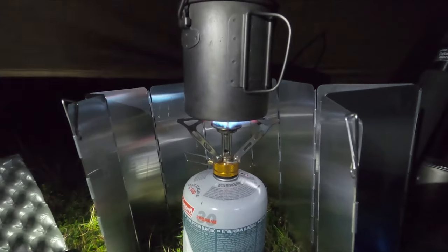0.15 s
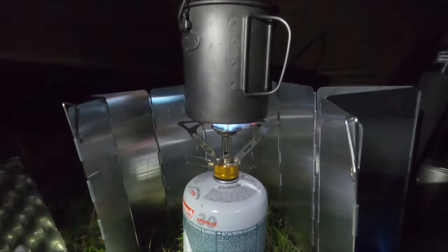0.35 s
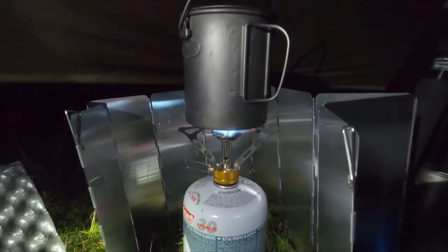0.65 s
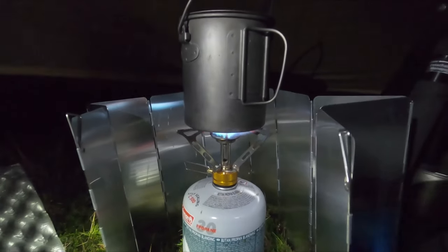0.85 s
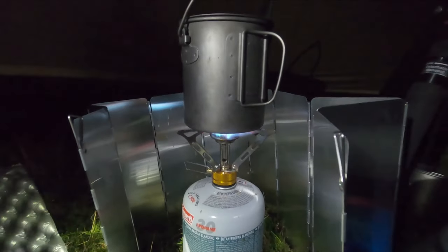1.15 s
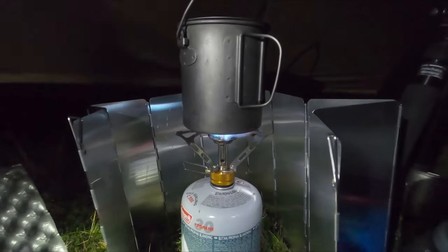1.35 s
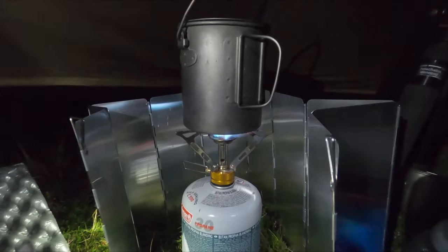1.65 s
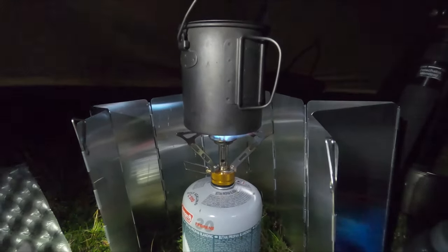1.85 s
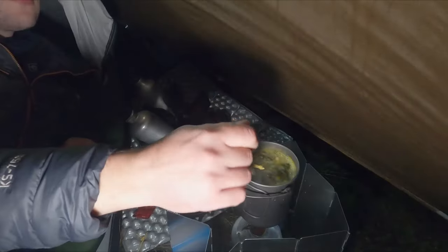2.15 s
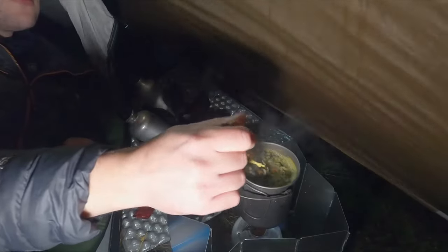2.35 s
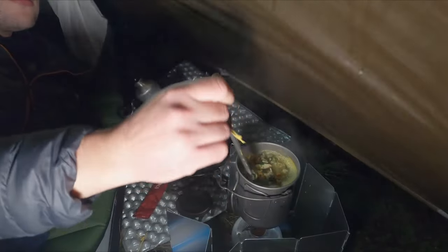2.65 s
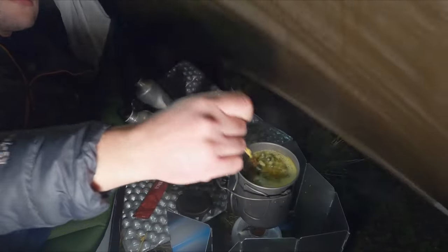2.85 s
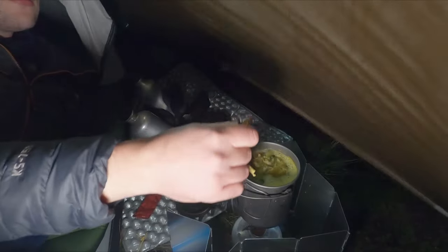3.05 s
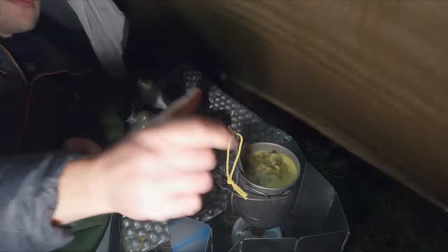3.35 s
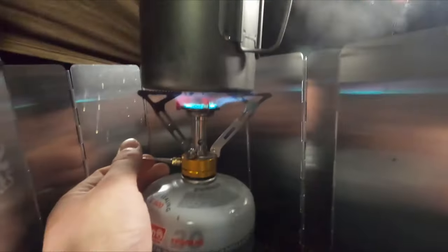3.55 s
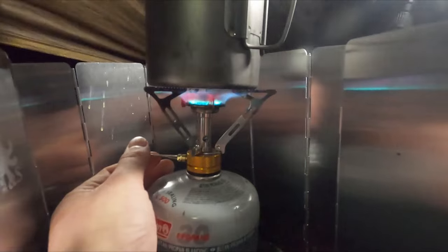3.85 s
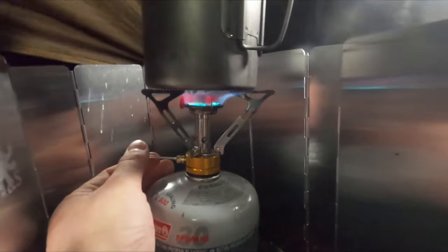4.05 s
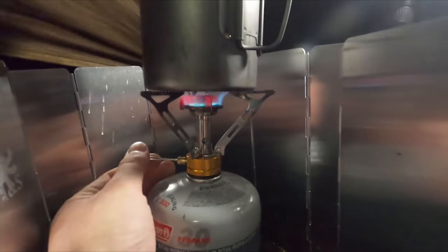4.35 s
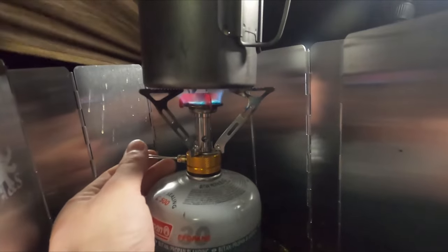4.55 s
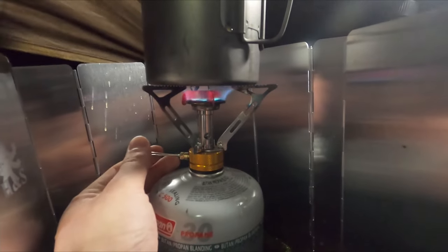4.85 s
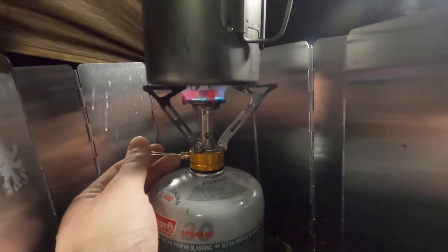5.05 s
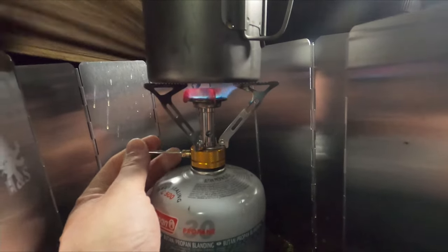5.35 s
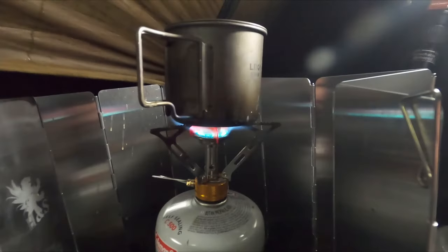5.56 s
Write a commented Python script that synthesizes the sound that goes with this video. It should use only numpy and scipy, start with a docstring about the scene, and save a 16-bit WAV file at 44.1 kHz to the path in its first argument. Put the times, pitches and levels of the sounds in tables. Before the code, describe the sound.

A small canister stove burns beneath a metal pot in a tent, heard closely in stereo with short reflections from a folding windscreen. From 0 to 2.0 s it is loudest: a dense, steady low-mid roar with bright jet hiss, whose thin metallic resonances gently swell and shift. At 2.0 s the sound cuts to a softer, duller burn from above. Deep soft bumps come near 2.8 and 3.04 s, with a small pop at about 3.1 s and a stronger thump at 3.44 s. At 3.5 s the view is close to the valve; hiss drops away and the flame sputters in rapid hollow puffs. From about 4.1 to 5.4 s it is very quiet: sparse fluttery pops, tiny dry metal ticks, faint bumps and soft air rumble. At 5.46 s a fuller, steady flame cuts in, with one sharper tick near 5.56 s.

```python
"""Gas stove in a tent.

A canister stove burns under a pot inside a folding windscreen: band-shaped noise for roar and jet hiss.
Heard from the front, from above the pot, then by the valve, where the gas is turned down.
There the flame sputters in single pressure pulses and hot metal ticks in bursts of filtered noise.
Low bumps and a soft air rumble lie around it; at the end the flame burns high again."""
import sys
import numpy as np
from scipy import signal
from scipy.fft import rfft, irfft, next_fast_len
from scipy.io import wavfile
from scipy.ndimage import uniform_filter1d

SR = 44100
rng = np.random.default_rng(int(sys.argv[2]) if len(sys.argv) > 2 else 0)


def master(y):
    """Save y as 16-bit WAV."""
    cut = np.clip(np.atleast_2d(y).T, -1, 1)
    pcm = np.round(cut * 32767)  # scale
    wavfile.write(sys.argv[1], SR, pcm.astype(np.int16))


N = 250929

# flame roar spectrum from each place: freq_hz, relative_db
ROAR_FRONT = [(15, -18), (40, -13), (80, -2.5), (120, 0.5), (165, -2.5), (346, -11.5), (481, -11.5),
              (572, -18), (693, -13), (873, -18.5), (1150, -17.5), (1790, -13), (1930, -23), (2700, -58.5)]
ROAR_ABOVE = [(12, -19), (20, 2), (32, -1), (60, -4.5), (160, -6.5), (346, -22.5), (462, -16.5),
              (654, -11.5), (809, -17), (925, -25.5), (1190, -22.5), (1560, -37.5), (2000, -37),
              (2600, -61), (4400, -120)]
ROAR_CLOSE = [(12, -34), (20, -3), (120, 0.5), (175, 3.5), (250, -1.5), (397, -9), (523, -16.5),
              (650, -13.5), (807, -17.5), (1400, -20.5), (1740, -28), (2200, -36), (2860, -75),
              (4840, -120)]
ROAR_HIGH = [(12, -30), (25, 1), (80, -1.5), (140, -3.5), (220, -4), (340, -4), (560, -16), (730, -12),
             (950, -25.5), (1300, -24), (1750, -26.5), (2000, -34), (3000, -62)]
# jet hiss spectrum from each place: freq_hz, relative_db
HISS_FRONT = [(1500, -36), (2000, 0.5), (2400, -6), (3600, -0.5), (4800, -5.5), (5900, -9.5), (6400, -12),
              (9000, -14.5), (12000, -25), (15000, -54)]
HISS_ABOVE = [(1500, -41), (2100, -3.5), (3000, 0.5), (4100, -3.5), (5300, -7.5), (6200, -10),
              (9000, -15.5), (12000, -27), (15000, -35)]
HISS_CLOSE = [(1600, -13), (2200, 4.5), (3500, 2), (5000, 1), (6600, -2.5), (7400, -5.5), (9500, -7.5),
              (12500, -13), (15000, -27)]
# resonances of burner tube, pot and windscreen in the hiss: center_hz, width_hz, lift_db
RINGS_FRONT = [(2645, 244, 11), (3295, 300, 7.5), (3740, 270, 2), (4140, 180, 3), (4780, 220, 7.5),
               (5720, 390, 7)]
RINGS_ABOVE = [(2663, 160, 13.1), (2980, 140, 7), (3560, 410, 4.9), (4670, 180, 5), (5580, 130, 4.9)]
RINGS_CLOSE = [(2800, 360, 8.4), (5850, 600, 14), (8400, 700, 4.2)]
RINGS_HIGH = [(5860, 450, 16), (6800, 450, 6), (8950, 470, 10), (10000, 600, 6)]
# resonances that open for a while: middle_s, half_length_s, center_hz, width_hz, lift_db
SWELLS_FRONT = [(.45, 0.22, 3230, 170, 7.5), (.88, 0.24, 2630, 170, 11.5), (1.35, 0.28, 3220, 220, 9.5),
                (1.86, .17, 2650, 169, 12)]
SWELLS_ABOVE = [(2.75, .14, 4770, 280, 10), (2.71, 0.12, 2600, 580, 10), (3.2, 0.35, 3620, 260, 10),
                (3.3, 0.41, 2860, 220, 8.5), (3.37, .17, 5500, 690, 5)]
# stronger rustle of the low flame: middle_s, half_length_s, level_db
FLURRIES = [(4.18, .03, -58.5), (4.657, .022, -64), (4.77, .03, -63), (4.869, .02, -56),
            (4.955, .03, -58.5), (5.124, .018, -58), (5.446, 0.031, -55)]
# loudest flame puffs, before the gap under the pot: middle_s, peak_db, pitch_hz
PUFFS = [(3.082, -24.5, 750), (3.505, -35.0, 700), (3.539, -39.5, 750), (3.57, -41, 700),
         (3.582, -36.5, 850), (3.655, -34, 1090), (3.661, -33.0, 700), (3.674, -38.0, 900),
         (3.685, -29.5, 750), (3.701, -38.5, 800), (3.74, -36.5, 902), (3.753, -38.0, 750),
         (3.778, -40, 800), (3.814, -36, 950), (3.822, -31.0, 700), (3.852, -39.0, 700), (3.887, -37, 700),
         (3.901, -34.0, 854), (3.908, -33, 800), (3.923, -32.5, 1450), (3.957, -36.5, 900),
         (3.966, -40.0, 850), (3.983, -37.5, 1100), (4.007, -36.5, 855), (4.023, -40.5, 650),
         (4.057, -43, 650), (4.064, -43, 650), (4.087, -38, 800), (4.094, -40, 850), (4.12, -45, 700),
         (4.148, -42.0, 900), (4.196, -36, 700), (4.297, -44.0, 950), (4.304, -44.0, 850),
         (4.34, -44.0, 900), (4.35, -45.5, 850), (4.356, -39.5, 1300), (4.443, -43, 1450), (4.47, -41, 950),
         (4.499, -40, 795), (4.56, -42.5, 1350), (4.603, -44, 800), (4.629, -45.0, 900),
         (4.641, -43.5, 900), (4.651, -41.0, 850), (4.7, -42, 650), (4.721, -44, 1100), (4.808, -37.5, 600),
         (4.856, -33.5, 900), (4.867, -43, 750), (4.878, -33, 650), (4.887, -45.5, 700), (4.946, -40, 750),
         (4.954, -45.0, 900), (4.964, -39.5, 1050), (4.981, -36.5, 700), (5.035, -38.5, 760),
         (5.107, -41, 850), (5.113, -46, 850), (5.125, -42.5, 800), (5.138, -48, 700), (5.223, -38, 850),
         (5.309, -43, 755), (5.325, -40, 700), (5.339, -43.0, 750), (5.403, -42.0, 1050),
         (5.42, -40.0, 900), (5.433, -35.5, 800), (5.445, -41.5, 1050)]
# colour of hot metal: freq_hz, gain_db
METAL = [(900, -1), (1700, 0), (3000, -0.5), (3800, -5), (4700, 0.5), (5700, -1), (6600, -6.5),
         (7700, -4.5), (12500, -9), (15000, -10)]
# clearest metal ticks and creaks, before the metal colour: start_s, peak_db, pitch_hz, t60_s
TICKS = [(3.616, -44, 2900, .012), (3.73, -48, 2700, .012), (3.777, -51, 3000, .012),
         (3.863, -49, 8500, .015), (3.964, -44, 6900, .016), (4.007, -50.5, 3000, .015),
         (4.014, -54, 4700, .02), (4.304, -59, 6000, .015), (4.354, -59, 5500, .04),
         (4.442, -48.5, 2100, .009), (4.442, -49, 5000, 0.0083), (4.604, -59, 3100, .014),
         (4.619, -49, 5400, .011), (4.628, -51, 5300, .009), (4.736, -58, 5000, .012),
         (4.855, -47, 2400, 0.039), (4.856, -52.5, 5000, .04), (4.893, -51.5, 4900, .012),
         (5.104, -54, 3000, 0.042), (5.103, -58, 5800, .025), (5.125, -53, 2300, .05),
         (5.123, -58, 6500, .04), (5.262, -56, 4600, .014), (5.283, -52, 4800, .012),
         (5.445, -48, 5000, .01), (5.556, -38, 3600, .012)]
# dull bumps near the microphone: middle_s, peak_db, pitch_hz
BUMPS = [(2.807, -21.5, 30), (3.042, -27, 40), (3.436, -15.5, 48.6), (4.5, -43.5, 218),
         (4.232, -37.5, 35.6), (4.765, -43, 200), (4.878, -36, 170), (4.985, -45, 210), (5.13, -35.5, 92),
         (5.325, -42, 230)]
# channel balance at full flame: freq_hz, left_minus_right_db
CHANNEL_BALANCE = [(60, 2.5), (110, 1.5), (200, 1.5), (370, 0.0), (690, -1.0), (1260, -0.5), (2320, 4),
                   (4260, 1), (7840, 0.5), (14400, -2)]
# extra travel time by windscreen panels and tent wall: lag_ms
PANEL_LAGS_MS = [1.3, 2.2, 3.1, 5.3]
# valve closed to a simmer, then opened: time_s, flow_db
GAS_FLOW = [(3.49, 1.5), (3.7, -0.5), (4.01, -1.5), (4.1, -12), (4.25, -15), (4.4, -19.5), (4.7, -15.5),
            (5.38, -16.5), (5.46, -6)]
# jet hiss close by, fading before the roar: time_s, level_db
SIMMER_HISS = [(3.49, -64.5), (3.7, -64.5), (3.8, -68), (3.91, -70.5), (3.99, -70), (4.1, -75), (4.25, -84),
               (4.7, -92), (5.38, -90), (5.46, -73)]

# changes of listening place
TO_ABOVE_S, TO_VALVE_S, TO_HIGH_S = 2.024, 3.490, 5.460
# full flame from each place: roar_db, hiss_db
FRONT_DB, ABOVE_DB, HIGH_DB = (-26.5, -39), (-31.5, -45.5), (-34.5, -58)
SIMMER_ROAR_DB = -39.5  # at 0 dB flow
# faint ticks: peak_db, pitch_hz, t60_s
TICK_Q, FAINT_TICK = 1.33, (-57, 4900, 0.0092)
BUMP_CYCLES = 0.9
# crack on top of a loud puff (level against the puff); mean pitch of the small puff beside it
CRACK_DB, CRACK_HZ, HUDDLE_HZ = -23.5, 2300, 850
TOP_HZ = 14400

T = np.arange(N) / SR
FFT_SIZE = 2 * next_fast_len(N // 2 + 1024)
F = np.maximum(np.arange(FFT_SIZE // 2 + 1) * SR / FFT_SIZE, 1)


def undb(db):
    """Decibels to gain."""
    return 10 ** (np.asarray(db) / 20)


def unit(x):
    """Scale to rms 1."""
    return x / np.sqrt(np.mean(x ** 2))


def shape(points):
    """Gain at every FFT frequency from (freq_hz, gain_db) points."""
    hz, db = np.transpose(points)
    return undb(np.interp(np.log(F), np.log(hz), db))


def colour(x, gain):
    """Filter by a gain at every FFT frequency."""
    return irfft(rfft(x, FFT_SIZE) * gain, FFT_SIZE)[..., :N]


def walk(rate_hz):
    """Smooth random wander, spread near 1."""
    k = max(int(SR / rate_hz), 1)
    steps = np.repeat(rng.standard_normal(N // k + 1), k)
    return 1.3 * uniform_filter1d(uniform_filter1d(steps, k), k)[:N]


def add(track, start_s, sound):
    """Mix a short sound into a track."""
    i = int(np.clip(start_s * SR, 0, N - 1))
    track[i:i + len(sound)] += sound[:N - i]


def between(start_s, end_s):
    """Gate with 4 ms edges."""
    return uniform_filter1d(1. * ((T >= start_s) & (T < end_s)), size=176)


def roar(spectrum, flutter_db, crackle_db):
    """Turbulent burning: the whole flame flutters, its upper part comes in quick bursts."""
    gain = shape(spectrum)
    upper = F ** 4 / (F ** 4 + 450 ** 4)
    noise = rng.standard_normal((3, N))
    bursts = unit(noise * undb(crackle_db * walk(220)))
    flame = colour(noise, gain * (1 - upper)) + colour(bursts, gain * upper)
    flame = flame * undb(flutter_db * walk(24.99))
    # level is set by the part above 60 Hz
    return flame / np.std(colour(flame, F > 60))


def reflections(x, echo_db, drift_ms):
    """Panels return the hiss a few ms later; paths shift as the hand-held microphone sways."""
    out = x
    for lag_ms in PANEL_LAGS_MS:
        source_s = T - (lag_ms + drift_ms * walk(1.5)) / 1000
        echo = np.array([np.interp(source_s, T, row) for row in x])
        out = out + undb(echo_db) * echo
    return out


def ring(spectrum, center_hz, width_hz, lift_db, flicker_db, drift):
    """One hiss resonance; swirling hot air makes it swell and bend gently on its own."""
    peak_db = lift_db / (1 + (2 * (F - center_hz) / width_hz) ** 2)
    # power added above the plain hiss
    lift = np.sqrt(undb(2 * peak_db) - 1)
    band = colour(rng.standard_normal((3, N)), shape(spectrum) * lift)
    bent_s = (T + np.cumsum(drift * walk(5)) / SR) % T[-1]
    bent = np.array([np.interp(bent_s, T, row) for row in band])
    return bent * unit(undb(flicker_db * walk(4)))


def hiss(spectrum, rings, waver_db, flicker_db, drift, swells=()):
    """Gas rushing from the jet, lifted at metal resonances; some only swell and pass."""
    rush = unit(reflections(rng.standard_normal((3, N)), echo_db=-14, drift_ms=.06))
    jet = colour(rush, shape(spectrum))
    for row in rings:
        jet = jet + ring(spectrum, *row, flicker_db, drift)
    for middle_s, half_s, *row in swells:
        opening = np.exp(-((T - middle_s) / half_s) ** 4)
        jet = jet + ring(spectrum, *row, flicker_db, drift) * opening
    return unit(jet) * undb(waver_db * walk(23.96))


def ports(direct, scattered, diffuse_hz, treble_lag_ms):
    """Two microphone ports: direct sound reaches the left later, treble comes scattered from all sides."""
    share = F ** 2 / (F ** 2 + diffuse_hz ** 2)
    # low tones bend around the housing and lag longer
    lag_ms = treble_lag_ms * (1 + 5.5 / (1 + (F / 480) ** 2))
    delay = np.exp(-1j * np.pi * F * lag_ms / 1000 * np.array([[1], [-1]]))
    return colour(direct, np.sqrt(1 - share) * delay) + colour(scattered, np.sqrt(share))


def burner(roar_db, hiss_db, flame, jet, diffuse_hz, treble_lag_ms):
    """Flame and jet at their levels, as they arrive at the microphone."""
    sound = flame * undb(roar_db) + jet * undb(hiss_db)
    return ports(sound[0], sound[1:], diffuse_hz, treble_lag_ms)


def still_air(rumble_db, hiss_db):
    """Low rumble of moving air, and a faint hiss that stays when the gas is low."""
    rumble_shape = shape([(10, -18), (22, 6.0), (70, 6.0), (150, -10.5), (400, -32), (2000, -70)])
    fizz_shape = shape([(500, 12.5), (2800, -1.5), (3950, -8.0), (4700, -2.5), (5500, -4.5),
                        (6500, -9.5), (7700, -5.5), (11000, -19.0), (15000, -24)])
    rumble = unit(colour(rng.standard_normal((3, N)), rumble_shape))
    fizz = unit(colour(rng.standard_normal((3, N)), fizz_shape))
    air = undb(rumble_db + 2 * walk(7)) * rumble + undb(hiss_db) * fizz
    return ports(air[0], air[1:], diffuse_hz=7850, treble_lag_ms=0.027)


def bumps():
    """Soft low knocks: cosines under a Gaussian, a cycle or two long."""
    out = np.zeros(N)
    for middle_s, db, hz in BUMPS:
        cycles = hz * (T - middle_s)
        out -= undb(db) * np.cos(2 * np.pi * cycles) * np.exp(-(cycles / BUMP_CYCLES) ** 2)
    return out


def puff_train(rows):
    """Each pocket of gas that burns at once sends one pressure swing, about a cycle long."""
    out, t = np.zeros(N), np.arange(-128, 128) / SR
    for middle_s, db, hz in rows:
        u = (np.pi * hz * t) ** 2
        add(out, middle_s + t[0], -undb(db) * (1 - 2 * u) * np.exp(-u))
    return out


def flow_db(time_s):
    """Gas flow through the valve."""
    return np.interp(time_s, *np.transpose(GAS_FLOW))


def sputter(small_db, spread_db, cluster_db, cluster_s, count):
    """Starved flame: loud puffs, each with a thin crack and a smaller puff; faint ones in between."""
    when, pitch = rng.random((count, 2)).T
    small_s = TO_VALVE_S + when * (TO_HIGH_S - TO_VALVE_S)
    spread = spread_db * np.clip(rng.standard_normal(count), -2, 1)
    # more gas makes bigger puffs
    level_db = small_db + 0.19 * flow_db(small_s) + spread
    small = zip(small_s, level_db, 420 * 2 ** (1.8 * pitch))
    cracks = [(s, db + CRACK_DB, CRACK_HZ) for s, db, _ in PUFFS]
    huddle = np.array([(s + cluster_s / 2, db + cluster_db, HUDDLE_HZ) for s, db, _ in PUFFS])
    huddle = huddle + rng.standard_normal(huddle.shape) * [cluster_s, 2, 200]
    return puff_train(PUFFS) + puff_train(cracks) + puff_train(huddle) + puff_train(small)


def puff_rings(ring_db, ring_ratio, t60_s):
    """A loud puff leaves the air under the pot ringing for a few cycles, mostly above its own pitch."""
    out, t = np.zeros(N), np.arange(2048) / SR
    for (s, db, hz), detune in zip(PUFFS, rng.standard_normal(len(PUFFS))):
        ring_hz = min(hz * ring_ratio * 2 ** (0.23 * detune), 1850)
        decay = undb(db + ring_db - 60 * t / t60_s)
        add(out, s, -decay * np.sin(2 * np.pi * ring_hz * t))
    return out


def under_pot(puffs, slap_s, slap_db, tail_db, t60_s):
    """Puffs leave by the gap under the pot, slap back once off the windscreen, die away in the tent."""
    t = np.arange(4096) / SR
    tail = rng.standard_normal(len(t)) * undb(-60 * t / t60_s) * (t > slap_s)
    tent = signal.fftconvolve(puffs, tail / np.linalg.norm(tail))[:N]
    slap = 1 + undb(slap_db) * np.exp(-2j * np.pi * F * slap_s)
    # 1.8 kHz resonance with a notch just above
    gap = shape([(200, 7.5), (500, 0), (660, 3.5), (950, -2.5),
                 (1300, 1.0), (1800, 3.0), (2150, -9.0), (3000, 2.5)])
    return colour(puffs, gap * slap) + undb(tail_db) * colour(tent, gap)


def hand_shadow(pass_s, pass_width_s, pass_db):
    """The stirring hand dims the jet as it passes over the pot."""
    return undb(pass_db * np.exp(-((T - pass_s) / pass_width_s) ** 2))


def rustle(steady_db, grain_db):
    """The edge of the low flame rustles softly all the time, and more in short flurries."""
    grains = rng.standard_normal(N) * undb(grain_db * walk(260))
    edge = shape([(250, -14), (550, 0.5), (1200, 1), (1900, -8.5), (3000, -28), (6000, -51)])
    level = undb(steady_db) * between(TO_VALVE_S, TO_HIGH_S)
    for middle_s, half_s, db in FLURRIES:
        level = level + undb(db) * np.exp(-((T - middle_s) / half_s) ** 4)
    return unit(colour(grains, edge)) * level


def ticks(rise_s, tail_db, tail_t60_s, count):
    """Metal slips as it heats and cools: dry snaps or grainy creaks with a faint ring; random faint ones."""
    out, t = np.zeros(N), np.arange(4096) / SR
    faint = [(s, *FAINT_TICK) for s in rng.uniform(TO_VALVE_S, TO_HIGH_S, count)]
    for start_s, db, hz, t60_s in list(TICKS) + faint:
        slips, rattle = rng.standard_normal((2, len(t)))
        # squaring makes the slips sparse and spiky
        push = slips * np.abs(slips) * undb(-60 * t / t60_s)
        push = push + rattle * undb(tail_db - 60 * t / tail_t60_s)
        band = signal.iirpeak(hz, TICK_Q, fs=SR)
        snap = push * (1 - np.exp(-t / rise_s))
        snap = signal.lfilter(*band, signal.lfilter(*band, snap))
        add(out, start_s, undb(db) * snap / np.abs(snap).max())
    return colour(out, shape(METAL))


def scene():
    """Front, above, simmer and high flame one after the other, with puffs, metal, bumps and air."""
    front_jet = hiss(HISS_FRONT, RINGS_FRONT, waver_db=1.0, flicker_db=1.45, drift=.014,
                     swells=SWELLS_FRONT)
    front = burner(*FRONT_DB, roar(ROAR_FRONT, flutter_db=0.5, crackle_db=1.0), front_jet,
                   diffuse_hz=8900, treble_lag_ms=0.031)

    above_jet = hiss(HISS_ABOVE, RINGS_ABOVE, waver_db=0.5, flicker_db=0.7, drift=.007,
                     swells=SWELLS_ABOVE)
    above_jet = above_jet * hand_shadow(pass_s=3.5, pass_width_s=0.037, pass_db=-0.5)
    above = burner(*ABOVE_DB, roar(ROAR_ABOVE, flutter_db=0.34, crackle_db=1.0), above_jet,
                   diffuse_hz=8950, treble_lag_ms=.036)

    simmer_hiss_db = np.interp(T, *np.transpose(SIMMER_HISS))
    simmer_jet = hiss(HISS_CLOSE, RINGS_CLOSE, waver_db=0.8, flicker_db=0.5, drift=0.0075)
    simmer = burner(SIMMER_ROAR_DB + flow_db(T), simmer_hiss_db,
                    roar(ROAR_CLOSE, flutter_db=1.1, crackle_db=3.5), simmer_jet,
                    diffuse_hz=36400, treble_lag_ms=0)

    high_jet = hiss(HISS_CLOSE, RINGS_HIGH, waver_db=1.5, flicker_db=1.5, drift=.006)
    high = burner(*HIGH_DB, roar(ROAR_HIGH, flutter_db=0.0, crackle_db=1.5), high_jet,
                  diffuse_hz=62000, treble_lag_ms=0)

    # half the balance to each channel
    balance = shape(CHANNEL_BALANCE) ** np.array([[.5], [-.5]])
    stove = colour(front * between(0, TO_ABOVE_S) + above * between(TO_ABOVE_S, TO_VALVE_S), balance)
    stove = stove + simmer * between(TO_VALVE_S, TO_HIGH_S) + high * between(TO_HIGH_S, N / SR)

    puffs = sputter(small_db=-48.5, spread_db=2.0, cluster_db=-10.5, cluster_s=.004, count=125)
    puffs = puffs + rustle(steady_db=-68.5, grain_db=4.5)
    puffs = puffs + puff_rings(ring_db=-9.5, ring_ratio=1.447, t60_s=0.019)
    puffs = under_pot(puffs, slap_s=0.00291, slap_db=-12, tail_db=-13, t60_s=0.072)
    metal = ticks(rise_s=0.00055, tail_db=-19, tail_t60_s=0.12, count=8)
    return stove + puffs + metal + bumps() + still_air(rumble_db=-51.0, hiss_db=-67.0)


def record(dry):
    """The recorder cuts the top with a steep elliptic low-pass."""
    low_pass = signal.ellip(10, .2, 70, TOP_HZ, fs=SR, output="sos")
    return signal.sosfilt(low_pass, dry)


dry = scene()
out = record(dry)
master(out)
```